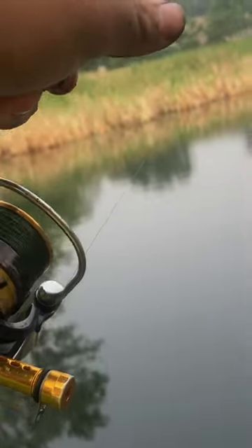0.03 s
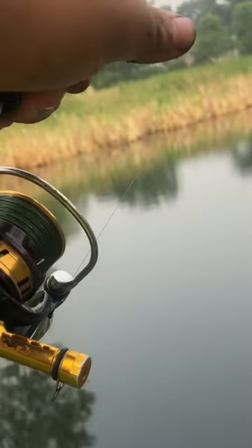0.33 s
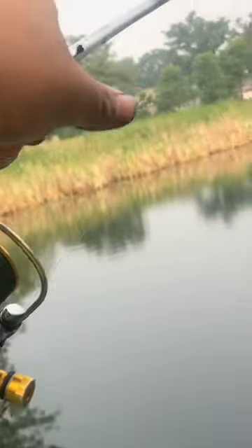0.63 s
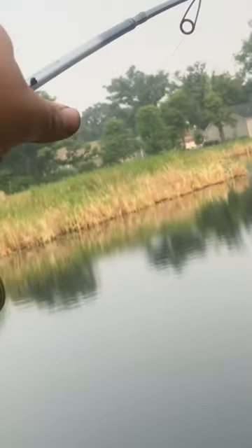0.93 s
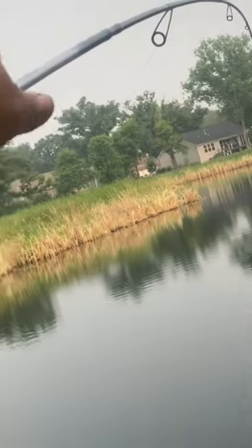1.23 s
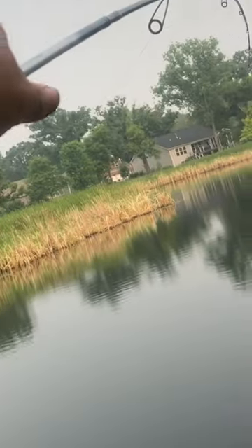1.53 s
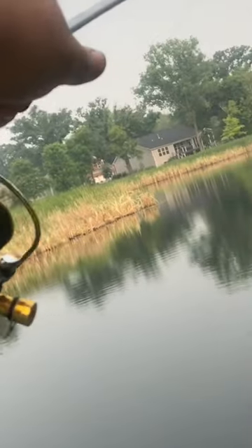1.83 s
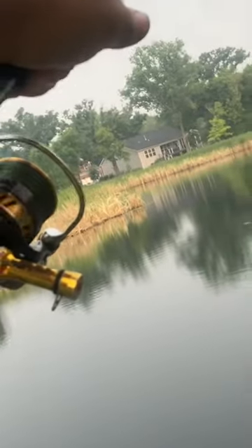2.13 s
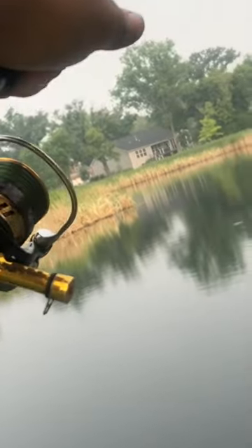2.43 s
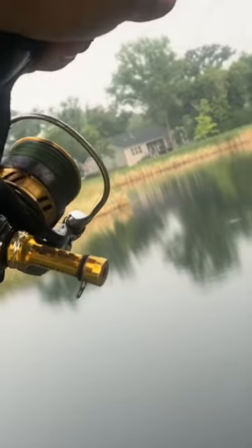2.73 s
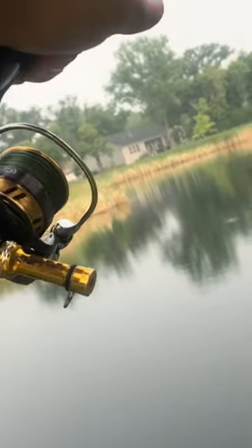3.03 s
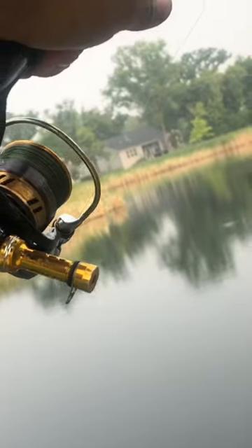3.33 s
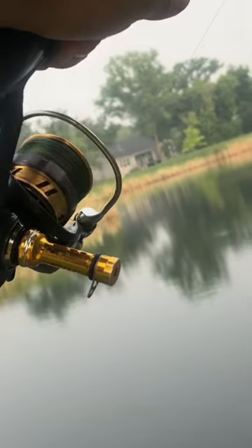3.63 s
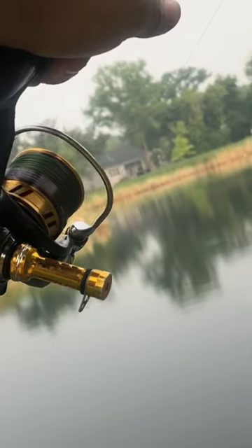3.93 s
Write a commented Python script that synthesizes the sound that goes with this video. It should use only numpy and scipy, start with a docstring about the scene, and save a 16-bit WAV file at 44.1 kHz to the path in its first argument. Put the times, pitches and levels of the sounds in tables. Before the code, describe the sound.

A fishing reel's drag buzzes, then slows to sparse metallic clicks outdoors.

```python
"""Beside a calm pond, a fish pulls line off a spinning reel. The drag's pawl strikes the teeth of the spool,
and each impact excites the damped modes of the metal: first a fast buzz, then single clicks as the run
dies away. The line hisses by friction in the rod guides. Behind it are an engine droning far off at its
firing rate, open air, a low rumble, a thin whine and three faint bird chirps."""
import sys
import numpy as np
from scipy import signal
from scipy.fft import rfft, irfft
from scipy.io import wavfile

SR = 44100
rng = np.random.default_rng(int(sys.argv[2]) if len(sys.argv) > 2 else 0)


def int16_out(signal):
    """Quantize to a 16-bit WAV file."""
    q = np.round(np.clip(np.atleast_2d(signal).T, -1, 1) * 32767)
    wavfile.write(sys.argv[1], SR, q.astype(np.int16))


N = 176400
T = np.arange(N) / SR


def amp(db):
    """The decibel scale: 20 dB is a factor of ten in amplitude."""
    return 10 ** (np.asarray(db) / 20)


def unit(x):
    """Normalisation to an rms of 1."""
    return x / np.sqrt(np.mean(x ** 2) + 1e-20)


def curve(rows, t, column=1):
    """Linear interpolation of one column of a time table."""
    rows = np.array(rows)
    return np.interp(t, rows[:, 0], rows[:, column])


def colour(x, points):
    """Spectral shaping by (Hz, dB) points joined on a logarithmic frequency axis."""
    hz, db = np.transpose(points)
    bin_hz = np.fft.rfftfreq(len(x), 1 / SR)
    gain = amp(np.interp(np.log(bin_hz + 1), np.log(hz), db))
    return irfft(rfft(x) * gain, len(x))


def drift(hz):
    """Random modulation: low-pass noise of rms 1 that moves at rates up to about hz."""
    low_pass = np.exp(-(np.fft.rfftfreq(N, 1 / SR) / hz) ** 2)
    return unit(irfft(rfft(rng.standard_normal(N)) * low_pass, N))


def add(mix, start, sound):
    """Superposition: a sound joins the mix at a start time in seconds."""
    part = mix[max(round(start * SR), 0):][:len(sound)]
    part += sound[:len(part)]


def snap(ring_db, tick_db, spread_db=2.2, detune=.007, chatter=.26, size=4096):
    """Impact excitation: the pawl lands with a dry tick and a brief rattle that rings the metal's modes."""
    # Modes of the reel's body, then of the pawl and spool rim.
    # Each row: frequency in Hz, relative level in dB, seconds to decay by 60 dB.
    metal_modes = [(2620, -34.5, 0.054), (2890, -31.5, 0.03), (3983, -20.5, 0.027), (5226, -28, 0.017),
                   (5970, -40, 0.071), (6020, -26.5, .008), (6700, -25, 0.0096), (8682, -0.5, 0.015),
                   (8868, 0.6, 0.013), (10770, -25.5, 0.078), (10980, -3, 0.012), (11850, -5.5, 0.01),
                   (12230, -9, 0.011), (13000, -24, 0.014), (14850, -16.5, .008), (15400, -23, 0.013)]
    # Spectrum of the contact's tick. Each row: frequency in Hz, relative level in dB.
    tick_spectrum = [(300, -6), (1500, -7), (2800, 1.5), (4600, -1), (6200, 2), (7500, -6.5), (9500, -8),
                     (10200, -6), (13000, 1), (15500, -5), (16200, -17)]
    t = np.arange(size) / SR
    hz, db, t60 = np.transpose(metal_modes)[:, :, None]
    level_draw, pitch_draw = rng.standard_normal((2, len(metal_modes), 1))
    hz = hz * (1 + detune * pitch_draw * t60.min() / t60)  # damped modes shift most with the contact
    envelope = np.exp(-np.log(1000) * t / t60) * (1 - np.exp(-t / .0014))
    modes = amp(db + spread_db * level_draw) * envelope * np.sin(2 * np.pi * hz * t)
    rattle = chatter * rng.standard_normal(size) * np.exp(-t / .00055)
    rattle[0] = 1  # the first impact
    rattled = irfft(rfft(modes) * rfft(rattle), size)
    ring = (modes.std(1) / rattled.std(1)) @ rattled  # summed so that each mode keeps its level
    tick_envelope = np.exp(-t / .002) * (1 - np.exp(-t / .0003))
    tick = colour(rng.standard_normal(size), tick_spectrum) * tick_envelope
    onset = slice(220)  # both levels refer to the first 5 ms
    return amp(ring_db) * ring / ring[onset].std() + amp(tick_db) * tick / tick[onset].std()


def drag(run_db=-1.7, click_db=-3, uneven_db=1.96, run_tick_db=-48, click_tick_db=-45.5):
    """An impact train: the pawl snaps once a tooth, a buzz at speed and single clicks as the spool slows."""
    # Speed of the spool in the run. Each row: time in seconds, teeth per second.
    spool_speed = [(0.0, 95.6), (0.033, 95.9), (0.06, 124.9), (0.118, 114.4), (0.156, 96.5), (0.284, 78.5),
                   (0.339, 64.7), (0.464, 53.2), (0.54, 66.3), (0.616, 79.2), (0.676, 78.3), (0.747, 57.8),
                   (0.87, 47.1), (0.997, 50.4), (1.037, 59.1), (1.166, 55.8), (1.228, 48.1), (1.29, 37.8)]
    # Strength of the snaps in the run. Each row: time in seconds, relative level in dB.
    strength = [(0.002, -28.5), (0.127, -27), (0.257, -29.5), (0.402, -23.5), (0.419, -29.5), (0.456, -26),
                (0.569, -29), (0.583, -25.5), (0.609, -31), (0.729, -27.5), (0.781, -28.5), (0.819, -29),
                (1.003, -35), (1.09, -29), (1.125, -30.3), (1.197, -26.5), (1.237, -37), (1.284, -28.5)]
    # Single clicks after the run. Each row: start in seconds, relative level in dB.
    clicks = [(1.3082, -27), (1.3329, -26.5), (1.3578, -30.5), (1.3819, -31), (1.4071, -32.5),
              (1.4337, -27.5), (1.4612, -31.5), (1.4889, -31.5), (1.52, -33.5), (1.556, -36.5),
              (1.5948, -32.5), (1.6362, -30), (1.684, -29.5), (1.7353, -27.5), (1.7904, -29.5),
              (1.8578, -29.5), (1.9198, -28), (1.9818, -28), (2.0299, -27), (2.0658, -26.5),
              (2.0993, -26.5), (2.1323, -33.5), (2.1636, -29.5), (2.1947, -25.5), (2.2257, -30),
              (2.2566, -25.5), (2.2915, -29), (2.3277, -30.5), (2.3753, -30), (2.4343, -27.5),
              (2.5324, -27.5), (2.6582, -28.5), (2.7931, -30), (2.9121, -33.5), (3.022, -32),
              (3.1496, -29.5), (3.3391, -29), (3.615, -28), (3.7382, -31), (3.8953, -33)]
    # Light slips of the pawl on a tooth. Each row: start in seconds, level of the ring in dB.
    slips = [(1.568, -46), (1.698, -52), (2.355, -44), (2.522, -43), (2.752, -54), (2.783, -52),
             (3.131, -42), (3.602, -52)]
    out = np.zeros(N)
    t = T[T < spool_speed[-1][0]]
    teeth_passed = np.floor(.824 + np.cumsum(curve(spool_speed, t)) / SR)  # begins partway along a tooth
    for start in t[1:][np.diff(teeth_passed) > 0]:
        ring_db = run_db + curve(strength, start) + uneven_db * rng.standard_normal()
        tick_db = run_tick_db + .0768 * curve(spool_speed, start)  # faster teeth tick louder
        add(out, start, snap(ring_db, tick_db))
    mean_db = np.mean(clicks, 0)[1]
    for start, db in clicks:
        # The spring drives every tick about equally hard, however loudly the metal rings.
        add(out, start, snap(click_db + db, click_tick_db + .12 * (db - mean_db)))
    for start, db in slips:
        add(out, start, snap(db, tick_db=db - 5))
    return out


def scatter(x, level_db=-27.5, t60_s=.23, size=8192):
    """Scattering off hands, rod and bank adds a faint tail that decays exponentially."""
    # Spectrum of the tail. Each row: frequency in Hz, relative level in dB.
    spectrum = [(1000, -15), (6000, -12), (8700, 13.5), (12000, -4), (16000, 15)]
    tail = colour(rng.standard_normal(size), spectrum) * np.exp(-np.log(1000) * T[:size] / t60_s)
    return x + amp(level_db) * signal.fftconvolve(x, tail / np.linalg.norm(tail))[:N]


def line_hiss(rough_db=2):
    """Friction noise: the line rubs unevenly through the guides and fades as the spool slows."""
    # Spectrum of the rubbing. Each row: frequency in Hz, relative level in dB.
    spectrum = [(500, -8), (1900, 4.5), (2850, 10.5), (3400, 1.5), (4000, 9.5), (4550, -14), (5150, 8),
                (5500, -3.5), (6100, -2.5), (6700, 0), (7500, -20), (9000, -2.5), (13000, -12),
                (16000, -22)]
    # Its fading course. Each row: time in seconds, level in dB.
    levels = [(0, -49.5), (.22, -54), (.36, -53.5), (.7, -57.5), (1.3, -54), (1.7, -56.5), (2.3, -56.5),
              (2.55, -61), (4, -64)]
    return unit(colour(rng.standard_normal(N), spectrum)) * amp(curve(levels, T) + rough_db * drift(170))


def engine(flutter_db=2.3, waver_db=1.5, waver_hz=3.9, wander_rad=.62):
    """Periodic firing: a far engine gives one strong tone and weaker orders at multiples of its rate."""
    # The firing tone. Each row: time in seconds, frequency in Hz, level in dB.
    firing = [(0.0, 137.7, -37.5), (0.31, 137.4, -33), (0.53, 136.2, -39.5), (0.76, 135.7, -33.5),
              (0.97, 133.9, -43.5), (1.22, 134.1, -39), (1.59, 133.8, -47), (1.73, 134, -41),
              (2.49, 134.7, -47), (2.77, 134.4, -38.5), (2.95, 133.9, -49), (3.2, 134.0, -42.5),
              (3.44, 133.6, -55.5), (4.0, 137, -49)]
    # Weak, lasting orders. Each row: multiple of the firing rate, level in dB.
    orders = [(2 / 5, -53), (3 / 5, -53.5), (6 / 5, -57)]
    # Overtones that come and go across the water. Each row: multiple, relative level in dB.
    overtones = [(2, 0), (3, -12.5), (4, -8)]
    # Their common swell. Each row: time in seconds, level in dB.
    overtone_levels = [(0, -67.5), (.7, -59), (.92, -51), (1.5, -56.5), (2, -53), (2.5, -64.5), (3.05, -54),
                       (3.4, -59.5), (4, -58)]
    phase = 2 * np.pi * np.cumsum(curve(firing, T)) / SR
    out = amp(curve(firing, T, column=2) - flutter_db * drift(waver_hz)) * np.sin(phase)
    swelling = [(multiple, db + curve(overtone_levels, T)) for multiple, db in overtones]
    for multiple, db in orders + swelling:
        waver = unit(amp(waver_db * drift(waver_hz)))
        out += amp(db) * waver * np.sin(multiple * phase + wander_rad * drift(waver_hz))
    return np.sqrt(2) * out


def air(swell_db=.54):
    """Ambient noise: the open air is a soft broadband wash, strongest in the bass."""
    # Spectrum of the open air. Each row: frequency in Hz, relative level in dB.
    spectrum = [(20, -28), (36, -31), (55, 2), (100, -1.5), (200, -3), (380, -5), (530, -6), (630, -10),
                (850, -4.5), (1150, -9.5), (1500, -14.5), (2100, -22), (4000, -27), (7500, -32),
                (11000, -48), (15500, -54)]
    # Its slow course. Each row: time in seconds, level in dB.
    levels = [(0, -48), (.8, -46.5), (2, -46.5), (2.9, -45.5), (3.2, -46), (4, -45)]
    return unit(colour(rng.standard_normal(N), spectrum)) * amp(curve(levels, T) + swell_db * drift(6.8))


def rumble():
    """Amplitude modulation of low-frequency noise: a rumble that comes and goes."""
    # Band of the rumble. Each row: frequency in Hz, relative level in dB.
    spectrum = [(25, -30), (42, -2), (58, 14), (75, 6), (110, 11), (300, -39), (1000, -88)]
    # Its swells. Each row: time in seconds, level in dB.
    levels = [(0, -55), (1.2, -47), (2.4, -59), (3.1, -69), (3.38, -62), (3.48, -46.5), (3.7, -52),
              (3.9, -53), (4, -40)]
    return unit(colour(rng.standard_normal(N), spectrum)) * amp(curve(levels, T))


def whine(hz=1157, waver_rad=2.1):
    """Slow phase modulation: a thin, far tone wavers as it swells and fades."""
    # Swell of the whine. Each row: time in seconds, level in dB.
    levels = [(.4, -86), (.88, -53), (1.05, -64), (1.35, -59), (1.7, -75)]
    phase = 2 * np.pi * hz * T + waver_rad * drift(7.5)
    return amp(curve(levels, T)) * np.sqrt(2) * np.sin(phase)


def birds(rough_rad=1.0):
    """Frequency sweeps: short rising chirps, made slightly hoarse by fast phase modulation."""
    # Bird chirps. Each row: start and length in seconds, first and last frequency in Hz, level in dB.
    chirps = [(1.917, .04, 2750, 2820, -54), (2.308, 0.031, 3140, 3320, -49),
              (3.552, 0.051, 7300, 7760, -64)]
    out = np.zeros(N)
    for start, length, first_hz, last_hz, db in chirps:
        hz = np.linspace(first_hz, last_hz, round(length * SR))
        phase = 2 * np.pi * np.cumsum(hz) / SR + rough_rad * drift(250)[:len(hz)]
        add(out, start, amp(db) * np.hanning(len(hz)) * np.sqrt(2) * np.sin(phase))
    return out


def scene():
    """Superposition in one channel: the reel close by, the sounds of the pond behind."""
    reel = scatter(drag()) + line_hiss()
    return (reel + engine() + whine() + birds() + air() + rumble())[None]


def record(dry, cutoff_hz=16250):
    """Band limiting: a linear-phase low-pass filter removes the highest treble."""
    low_pass = signal.firwin(255, cutoff_hz, window=("kaiser", 9), fs=SR)
    return signal.oaconvolve(dry, low_pass[None], "same")


dry = scene()
out = record(dry)
int16_out(out)
```